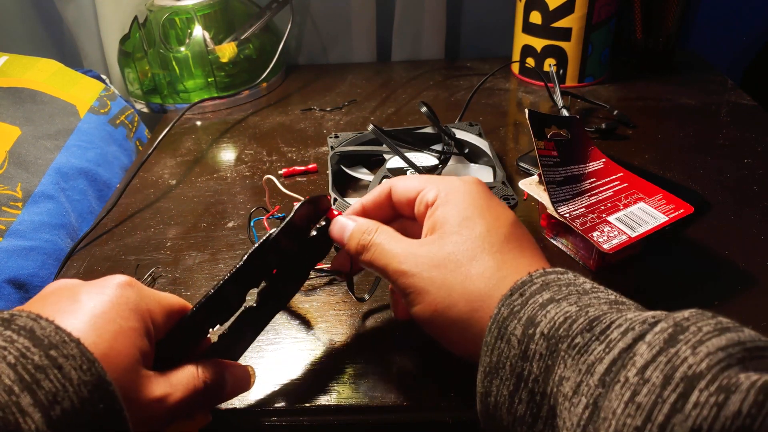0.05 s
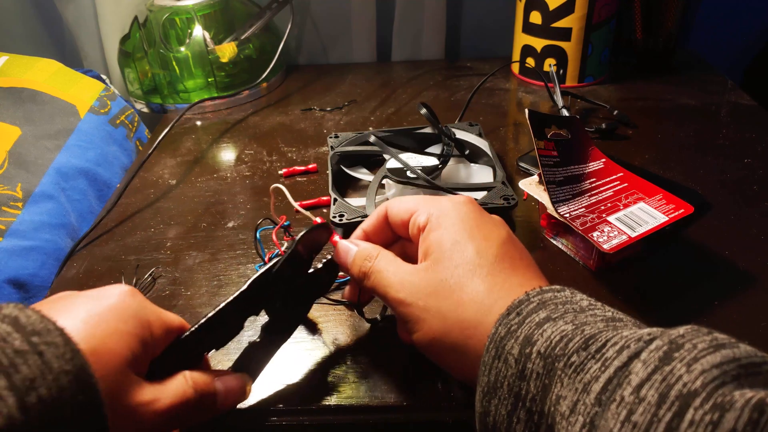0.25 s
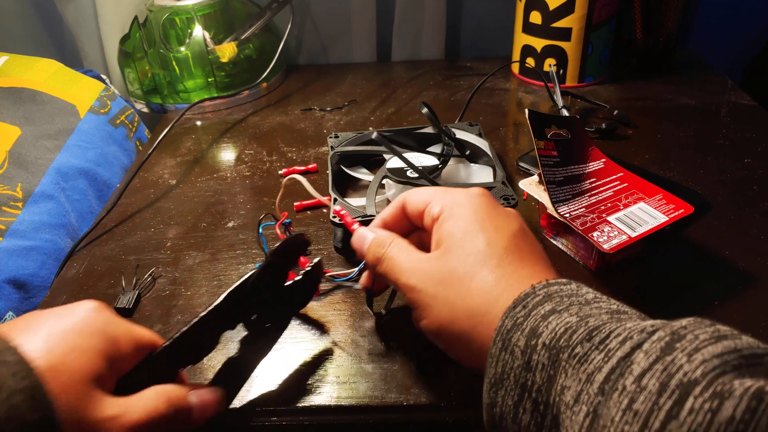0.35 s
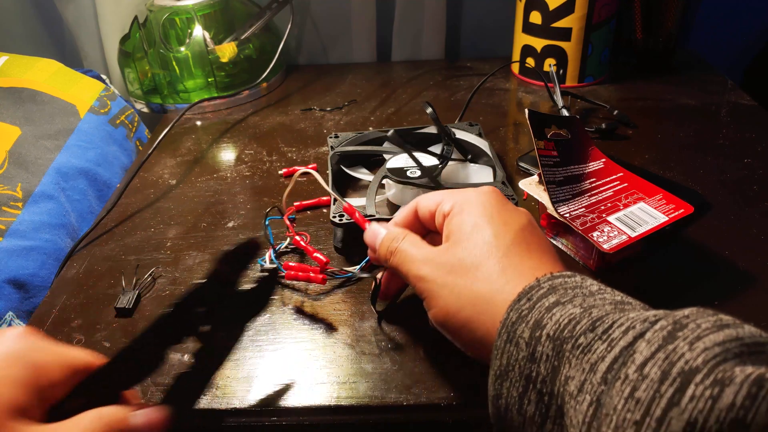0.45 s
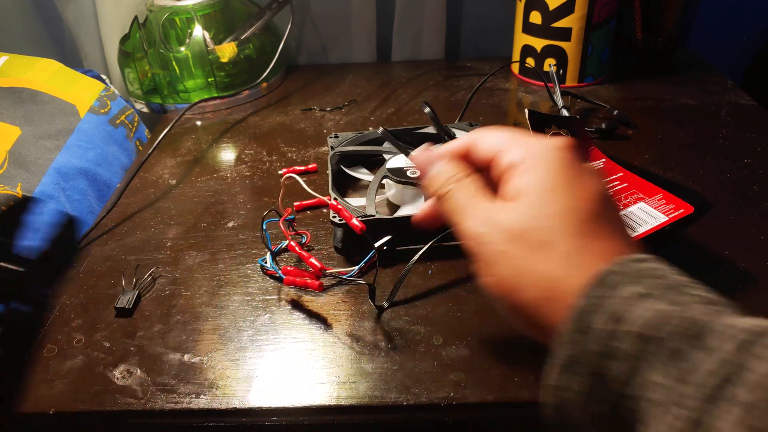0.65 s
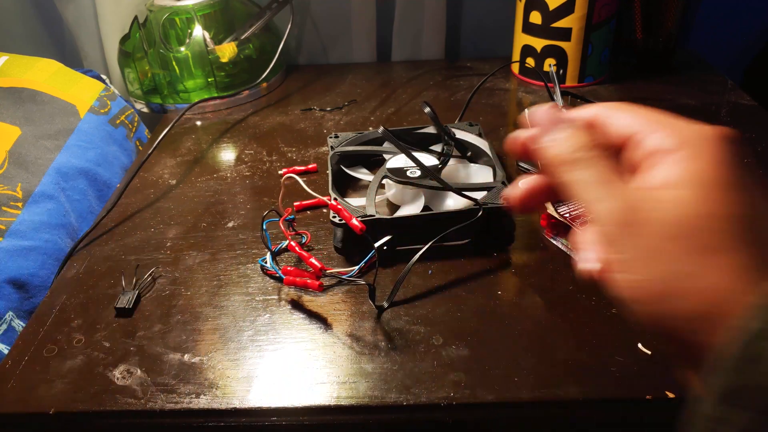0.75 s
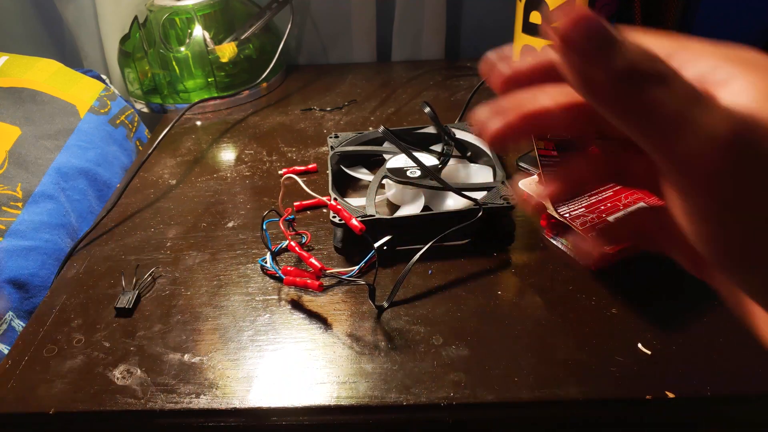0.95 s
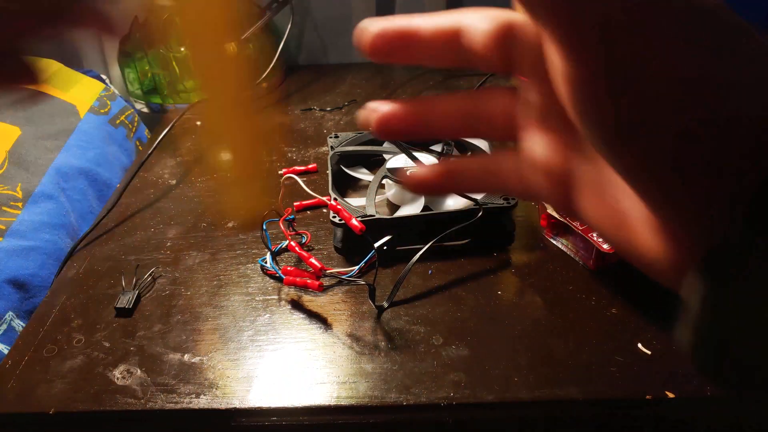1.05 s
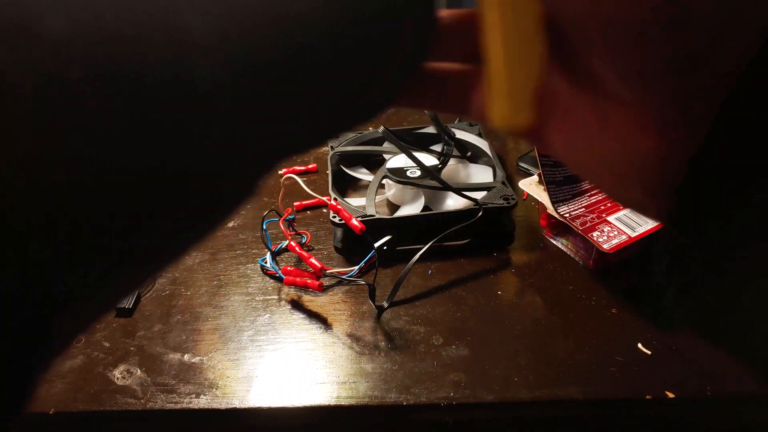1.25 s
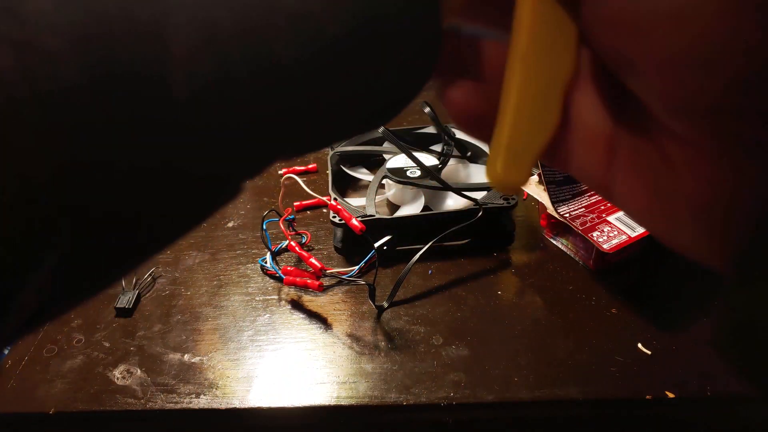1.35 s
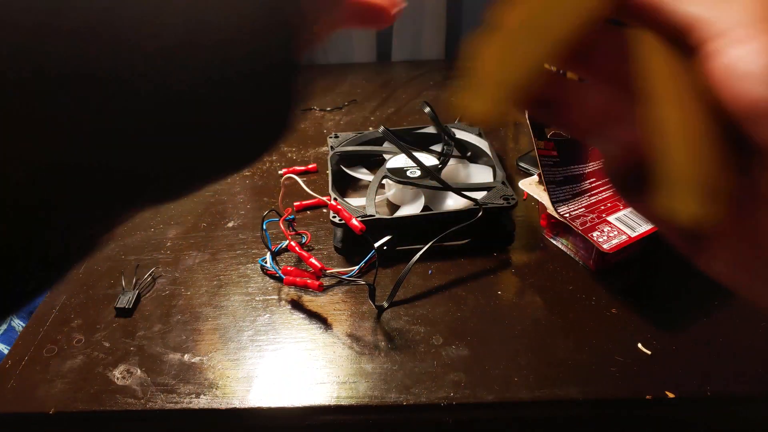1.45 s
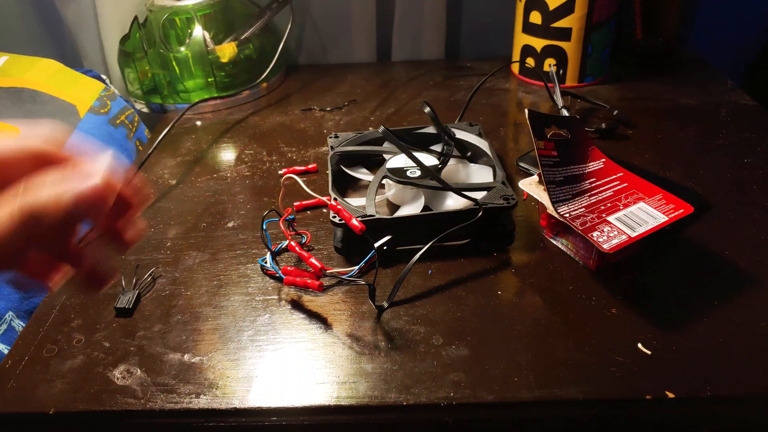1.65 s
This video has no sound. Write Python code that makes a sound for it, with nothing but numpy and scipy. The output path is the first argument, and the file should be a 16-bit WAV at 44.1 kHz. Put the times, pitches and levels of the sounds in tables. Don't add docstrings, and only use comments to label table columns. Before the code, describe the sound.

A crimping tool knocks loudly on a wooden desk, small connectors tick and a plastic box is tapped faintly, then a bright latch snap close to the microphone; quiet humming room, soft cloth rubs at the end.

```python
import sys
import numpy as np
from scipy import signal
from scipy.io import wavfile

SR = 44100
rng = np.random.default_rng(int(sys.argv[2]) if len(sys.argv) > 2 else 0)


def field_ratio(decibels):
    return 10 ** (np.asarray(decibels, dtype=float) / 20)


def file_out(sig):
    cols = np.atleast_2d(sig).T
    lim = np.clip(cols, -1, 1)
    pcm = np.round(lim * 32767).astype(np.int16)
    wavfile.write(sys.argv[1], SR, pcm)


N = 74970

# (time [s], level [dB], left-right [dB])
KNOCKS = [
    (.2125, -26, 1.5),
    (.2213, -4.5, -2),
    (.2227, -3.5, -1),
    (.243, -22.5, -1.5),
]
# (time [s], level [dB], left-right [dB])
SNAPS = [(.0095, -61, 9.5), (1.2462, -43.5, 12.5), (1.2471, -24.5, 6), (1.2474, -13, 3.5),
         (1.24815, -17, 0.5), (1.2501, -30.5, 0.5), (1.2512, -28, -4), (1.2533, -32, 5.5),
         (1.2539, -20.5, 7.5), (1.2546, -23.5, 9), (1.2551, -31.5, 9), (1.2563, -29.5, 8.5),
         (1.2577, -26.5, 12.5), (1.2598, -32, 3), (1.2617, -38, -7), (1.2643, -37, 7), (1.2682, -40.5, -10),
         (1.683, -68.5, -9.5)]
# (time [s], level [dB], left-right [dB])
TICKS = [
    (.045, -84, 3),
    (.398, -83.5, -1),
    (.4309, -74.5, 4),
    (.509, -59, 4),
    (.5097, -60, 1.5),
    (.5107, -59.5, 2.5),
    (.5134, -65, -3),
    (.5183, -72, 3),
    (.5935, -81.5, -1),
]
# (frequency [Hz], level [dB])
SNAP_SPECTRUM = [(400, -16), (1500, -19), (2400, -21), (3100, -9), (5500, -2), (8500, -5), (11500, -17),
                 (14000, -41.5)]
# (frequency [Hz], level [dB], t60 [s], left-right [dB])
RUBBED_MODES = [(301, 3.5, .05, 1), (441, -2, .08, -4), (570, -7.5, .03, -2), (657, -2, 0.04, -4.5),
                (798.4, -7, .03, -3.5), (1080, -19.5, 0.036, -0.5), (1300, -8.5, .015, 3),
                (1480, -8.5, .015, 2.5), (2300, -27.5, .01, 0.5), (2597, -27, .02, 0.5)]


def pan(db):
    return field_ratio(np.array([[.5], [-.5]]) * db)


def rms_one(x):
    return x / np.sqrt(np.mean(x ** 2) + 1e-20)


def at_hz(points, hz):
    points_hz, values = np.transpose(points)
    return np.interp(np.log(hz), np.log(points_hz), values)


def drift(rate_hz):
    r = np.exp(-80 * np.pi * rate_hz / SR)
    white = rng.standard_normal(N // 40 + 2002)
    slow = signal.lfilter([1], [1, -2 * r, r * r], white)[2000:]
    return np.interp(np.arange(N) / 40, np.arange(len(slow)), rms_one(slow))


def ring(clicks, hz, t60_s):
    r = field_ratio(-60 / (t60_s * SR))
    w = 2 * np.pi * hz / SR
    return signal.lfilter([0, np.sin(w)], [1, -2 * r * np.cos(w), r * r], clicks + 1e-18)


def ring_all(force, modes, low_hz, soft_hz):
    out = 0
    for k, (hz, db, t60_s, side_db) in enumerate(modes):
        out = out - field_ratio(db) * pan(side_db) * ring(force(k, hz), hz, t60_s)
    high_pass = signal.butter(2, low_hz, "high", fs=SR, output="sos")
    low_pass = signal.butter(4, soft_hz, fs=SR, output="sos")
    return signal.sosfilt(np.vstack([high_pass, low_pass]), out)


def strike(hits, modes, low_hz, soft_hz, spread_db, lag_s):
    late_cycles = .6
    s, db, side_db = np.transpose(hits)
    luck = rng.standard_normal((len(s), len(modes)))

    def force(k, hz):
        clicks = np.zeros((2, N))
        at = ((s + late_cycles / hz + [[0], [lag_s]]) * SR).astype(int)
        clicks[[[0], [1]], at] = field_ratio(db + spread_db * luck[:, k]) * pan(side_db)
        return clicks

    return ring_all(force, modes, low_hz, soft_hz)


def bands(spectrum, shape, patchy_db, alike):
    out, power = 0, 0
    edges_hz = 20 * 2 ** np.arange(0, 9.6, .5)
    white = rng.standard_normal((2, 2, N))
    for k, (low, high) in enumerate(zip(edges_hz, edges_hz[1:])):
        band = signal.butter(2, [low, high], "band", fs=SR, output="sos")
        mid, side = signal.sosfilt(band, white[k % 2])
        hz = np.sqrt(low * high)
        c = np.clip(alike(hz), -1, 1)
        gain = field_ratio(at_hz(spectrum, hz))
        power += gain ** 2 * 4 * (high - low) / SR
        stereo = np.sqrt(1 + c) * mid + np.sqrt(1 - c) * side * [[1], [-1]]
        out = out + gain * field_ratio(patchy_db * drift(21)) * shape(hz) * stereo
    return out / np.sqrt(power)


def strokes(rows, late_s=0):
    t = np.arange(N) / SR - late_s
    out = 0
    for s, rise, fall, db in rows:
        ramp = np.interp(t, [s, s + rise, s + rise + fall], [0, 1, 0])
        out = out + field_ratio(db) * np.sin(np.pi / 2 * ramp) ** 2
    return out


def room_tone():
    # (frequency [Hz], rms level [dB])
    harmonics = [(60, -64.5), (120, -65.5), (240, -73), (360, -81)]
    # (frequency [Hz], level [dB])
    floor = [(20, -9), (55, -2), (120, -11), (160, -18.5), (500, -24), (1800, -34.5), (4000, -43),
             (12000, -44.5)]
    # (frequency [Hz], correlation [-1..1])
    likeness = [(60, -0.56), (240, 1), (950, -0.29), (3770, -0.61), (15000, -0.8)]
    floor_db, floor_pan_db, rumble_patchy_db = -61, 2, 1.5
    t = np.arange(N) / SR
    hum = sum(field_ratio(db) * np.sqrt(2) * np.sin(2 * np.pi * hz * t) for hz, db in harmonics)

    def lumps(hz):
        return field_ratio(rumble_patchy_db * drift(7.6) * (hz < 110))

    noise = bands(floor, lumps, patchy_db=1.8, alike=lambda hz: at_hz(likeness, hz))
    return field_ratio(floor_db) * pan(floor_pan_db) * noise + hum


def mount_nudges():
    # (time [s], level [dB], frequency [Hz], t60 [cycles], left-right [dB])
    bumps = [(.01, -50, 55.3, 11, -23.5), (0.213, -29.5, 61, 13, 7), (0.299, -43.5, 43.9, 8.5, -37),
             (0.5109, -44, 420, 24, 0), (.625, -56.5, 450, 53, -2), (0.577, -35.5, 55, 4.2, 0),
             (0.865, -46, 40, 11.5, 1.5), (1.225, -35, 55, 13, 5), (1.376, -52, 190, 41, -12.5),
             (1.509, -30.5, 56, 3.9, 2), (1.6, -55, 55, 10.3, -1)]
    left_lead_rad = 1.1
    out = 0
    for s, db, hz, cycles, side_db in bumps:
        age = np.maximum(np.arange(N) / SR - s, 0) * hz
        wave = np.sin(2 * np.pi * age + [[left_lead_rad], [0]])
        out = out + field_ratio(db) * pan(side_db) * wave * (1 - np.exp(-3.0 * age)) * field_ratio(-60 * age / cycles)
    return out


def hand_swishes():
    # (start [s], rise [s], fall [s], level [dB])
    sweeps = [
        (1.362, 0.035, 0.035, -57),
        (0.43, 0.075, 0.042, -62.5),
    ]
    # (frequency [Hz], level [dB])
    cloth = [(300, 13.5), (700, 3.5), (1100, 11), (1800, 10.5), (2600, -19.5), (4000, -10), (9000, -56)]
    climb_s = .01

    def shape(hz):
        return strokes(sweeps, climb_s * np.log2(hz / 1000))

    return pan(1.7) * bands(cloth, shape, patchy_db=1.5, alike=lambda hz: .5)


def sleeve_brushes():
    # (start [s], rise [s], fall [s], level [dB])
    sweeps = [
        (.42, 0.038, 0.2, -71),
        (1.42, 0.091, 0.094, -65),
        (1.56, 0.057, 0.16, -62),
    ]
    brush = rng.standard_normal((2, N)) * strokes(sweeps) * field_ratio(-21.5)
    return ring_all(lambda k, hz: brush, RUBBED_MODES, low_hz=385.0, soft_hz=1220)


def tool_drags():
    # (start [s], rise [s], fall [s], level [dB])
    pulls = [
        (-.02, 0.012, 0.082, -53),
        (.03, 0.026, 0.075, -52),
        (.185, 0.07, 0.015, -35),
        (.58, 0.015, 0.11, -67.5),
    ]
    slips_per_s = 2500
    slips = (rng.random(N) < slips_per_s / SR) * rng.standard_normal(N)
    slips = slips * strokes(pulls) * field_ratio(-9)
    return ring_all(lambda k, hz: slips, RUBBED_MODES, low_hz=197, soft_hz=3000)


def latch_slides():
    # (start [s], rise [s], fall [s], level [dB])
    moves = [
        (1.19, 0.1, 0.0063, -58.5),
        (1.35, 0.028, 0.072, -71.5),
        (1.46, 0.032, 0.071, -80),
    ]
    slide = strokes(moves)
    return pan(4.5) * bands(SNAP_SPECTRUM, lambda hz: slide, patchy_db=1.5, alike=lambda hz: .3)


def echoes(hits, spectrum):
    # (frequency [Hz], t60 [s])
    room_t60 = [(150, 0.43), (1000, 0.17), (4000, 0.22), (10000, 0.035)]
    rise_s = 0.0013

    def shape(hz):
        out = 0
        for s, db in hits:
            age_s = np.maximum(np.arange(N) / SR - s, 0)
            out = out + (1 - np.exp(-age_s / rise_s)) * field_ratio(db - 60 * age_s / at_hz(room_t60, hz))
        return out

    return bands(spectrum, shape, patchy_db=2.5, alike=lambda hz: 0.49)


def room_answers():
    # (frequency [Hz], level [dB])
    knock_spectrum = [(150, -21), (320, -3), (800, -11), (1500, -21), (2200, -35), (6500, -40.5),
                      (8000, -60), (12000, -58.5)]
    knock_db, tick_db, snap_db, wall_delay_s = -16.5, -59, -39, 0.012
    knock = echoes([(KNOCKS[1][0], knock_db)], knock_spectrum)
    bright = echoes([(TICKS[4][0], tick_db), (SNAPS[3][0] + wall_delay_s, snap_db)], SNAP_SPECTRUM)
    return knock + bright


def box_taps():
    # (frequency [Hz], level [dB], t60 [s], left-right [dB])
    box_modes = [(191, -2.5, 0.14, -25), (742, -0.5, 0.083, -18.5), (1240, -9.5, 0.06, -13),
                 (1504, -10, 0.035, -12)]
    # (time [s], level [dB], left-right [dB])
    touches = [
        (.7045, -60, 0),
        (.706, -53, 0),
        (.7215, -56.5, 1),
    ]
    return strike(touches, box_modes, low_hz=120, soft_hz=1650, spread_db=1, lag_s=0.000073)


def connector_ticks():
    # (frequency [Hz], level [dB], t60 [s], left-right [dB])
    connector_modes = [(1465, 1, .1, -4), (1565, -4, 0.11, 16), (1860, -14, 0.037, 16),
                       (2013, 5.5, 0.11, 17), (2240, -8, 0.046, 8), (2740, -3, 0.093, 16.5),
                       (2720, 3, .07, -1.5), (3350, -1, .15, -10.5), (3280, -5, 0.17, 0),
                       (4240, -3, .03, 0), (4640, -9, 0.016, 12), (5880, 10.5, 0.0085, 9),
                       (6680, 4.5, 0.01, 15.5)]
    return strike(TICKS, connector_modes, low_hz=870, soft_hz=9000, spread_db=1.5, lag_s=0.00019)


def latch_snap():
    # (frequency [Hz], level [dB], t60 [s], left-right [dB])
    latch_modes = [(423.4, -32.5, .037, -1), (1000, -26, .01, 0), (1500, -25.5, .006, 2),
                   (1900, -20.5, 0.011, 8.5), (3135, -14, .005, 4), (3950, -1.5, 0.0067, -2),
                   (3990, -27.5, 0.023, -1.5), (5190, -15, 0.0096, 7.5), (6670, -4.5, 0.0043, 14),
                   (8460, -4.5, 0.0046, 8), (9650, -11, .008, -7.5), (10180, -12.5, 0.0027, -11.5),
                   (11500, -9, .002, 4), (14800, 6, 0.0022, -0.5)]
    # (frequency [Hz], level [dB], t60 [s], left-right [dB])
    jaw_modes = [(1919, -27.5, 0.12, 8), (3100, -32.5, .1, 0), (4320, -34.5, .16, -0.5),
                 (5300, -40.5, 0.16, 1.5), (6260, -39.5, .14, 4.5), (6560, -41.5, 0.22, 8),
                 (6980, -44.5, 0.15, 5.5), (8450, -43, .12, 2.5)]
    contact = dict(low_hz=180, soft_hz=17000, spread_db=1.5, lag_s=.0003)
    return strike(SNAPS, latch_modes, **contact) + strike(SNAPS, jaw_modes, **contact)


def desk_knocks():
    # (time [s], level [dB], left-right [dB])
    thuds = [
        (.2125, -36.5, -0.5),
        (.2212, -11, 1.5),
        (.2241, -7, -0.5),
        (.2273, -11, 1.5),
    ]
    # (frequency [Hz], level [dB], t60 [s], left-right [dB])
    desk_modes = [(132, -33, .14, 9), (192, -14.5, 0.26, 9.5), (239.3, -16.5, 0.32, 3),
                  (284.4, -4, .16, 1.5), (300.2, -16, .14, -10.5), (331, -2, .115, 2),
                  (340, -36.5, .7, -5.5), (348, -34, 0.56, -0.5), (356.5, -15, 0.21, -3.5),
                  (381.6, -18.5, .17, 7), (417.6, -8.5, 0.072, -4), (459, -6.5, .06, -3)]
    # (frequency [Hz], level [dB], t60 [s], left-right [dB])
    tool_modes = [(551.2, -21, .16, -1), (620, -18, .18, -9.5), (666, -15, .11, 0.5),
                  (739.6, -20, 0.17, -2.5), (750, -4, 0.014, -9), (947, -25.5, .1, -9),
                  (1144, -19.5, .03, 8), (1244, -26, 0.14, -12.5), (1290, -5, 0.0071, -4),
                  (1370, -21.5, .065, -1.5), (1410, -8, 0.031, 14.5), (1700, -38.5, .1, 0),
                  (1850, -41, .12, -1.5)]
    contact = dict(soft_hz=1600, spread_db=2.0)
    desk = strike(thuds, desk_modes, low_hz=110, lag_s=0.0001, **contact)
    body = strike(KNOCKS, tool_modes, low_hz=140, lag_s=.0003, **contact)
    return desk + body


def scene():
    background = room_tone() + mount_nudges()
    rubs = hand_swishes() + sleeve_brushes() + tool_drags() + latch_slides()
    small = box_taps() + connector_ticks()
    return background + rubs + room_answers() + small + latch_snap() + desk_knocks()


def roll_off(x):
    return signal.sosfilt(signal.butter(12, 16330, fs=SR, output="sos"), x)


def record(dry):
    port_gain = [
        [0.9],
        [0.25],
    ]
    port_hz, port_width_hz = 6600, 350
    peak_limit = 1.15
    cutoff_hz, stop_db = 12600, 34.5
    whistle = signal.lfilter(*signal.iirpeak(port_hz, port_hz / port_width_hz, fs=SR), dry)
    ported = dry + np.array(port_gain) * whistle
    rounded = peak_limit * np.tanh(ported / peak_limit)
    dull = signal.sosfilt(signal.cheby2(8, stop_db, cutoff_hz, fs=SR, output="sos"), rounded)
    return roll_off(dull)


dry = scene()
out = record(dry)
file_out(out)
```